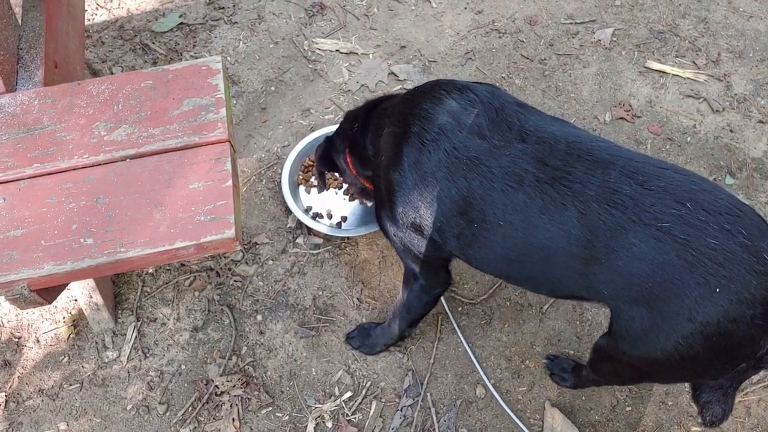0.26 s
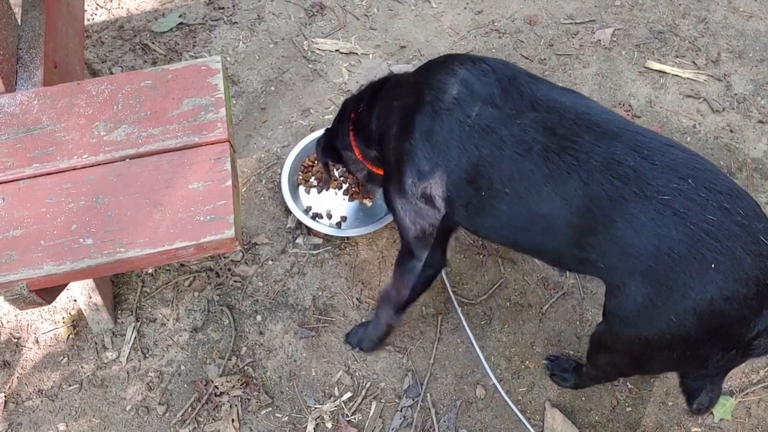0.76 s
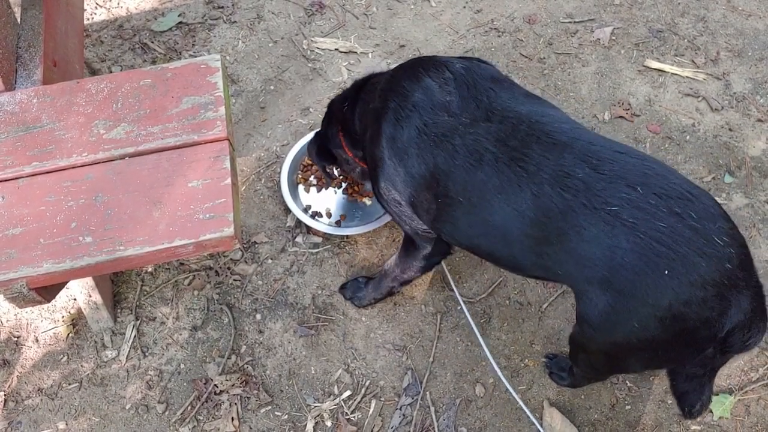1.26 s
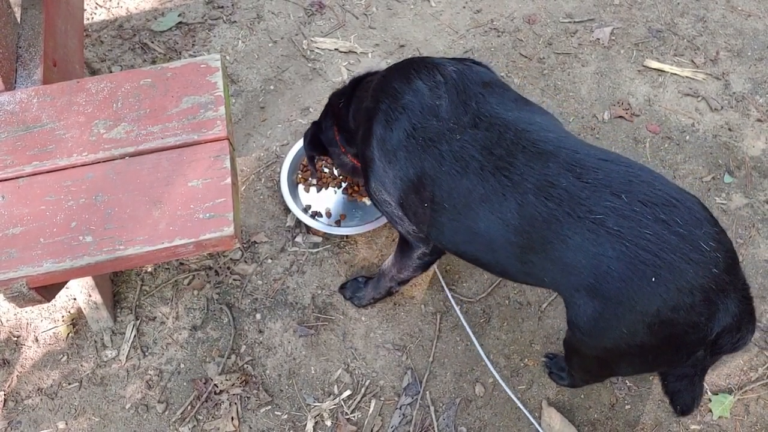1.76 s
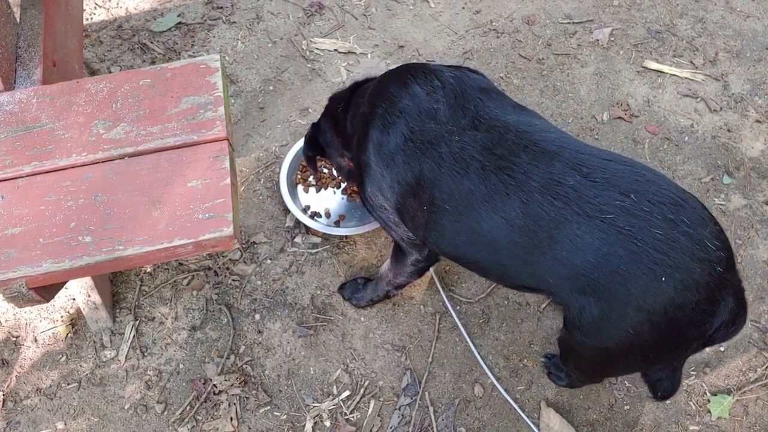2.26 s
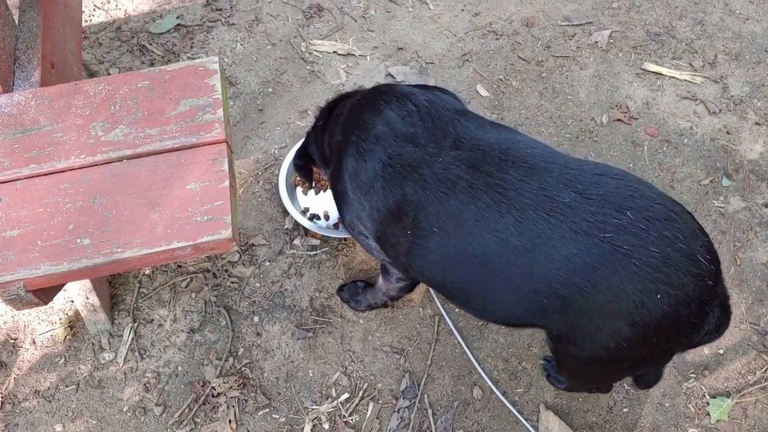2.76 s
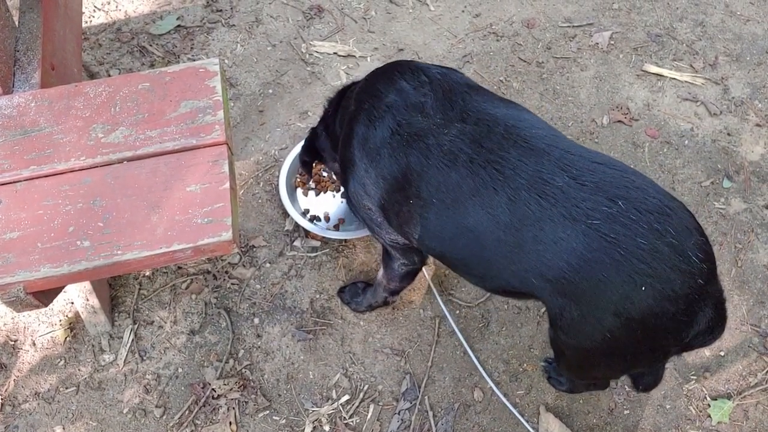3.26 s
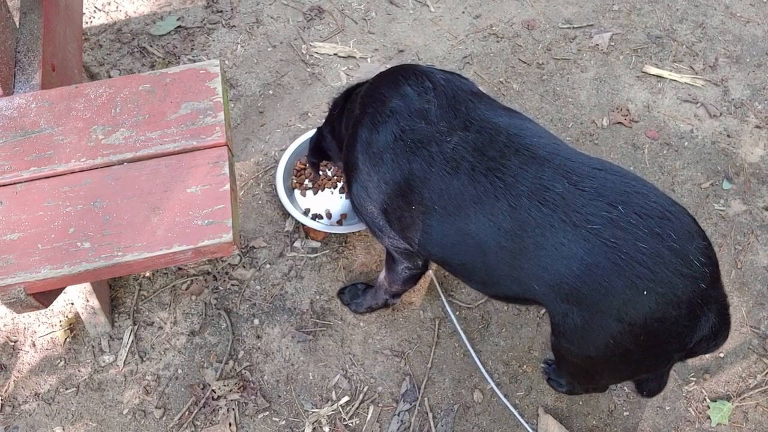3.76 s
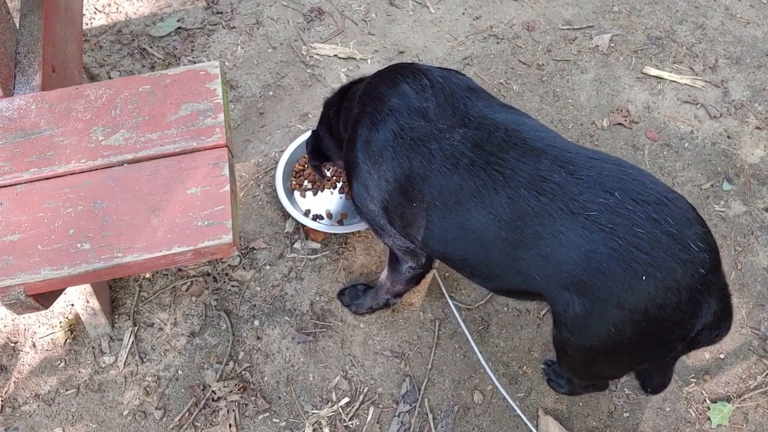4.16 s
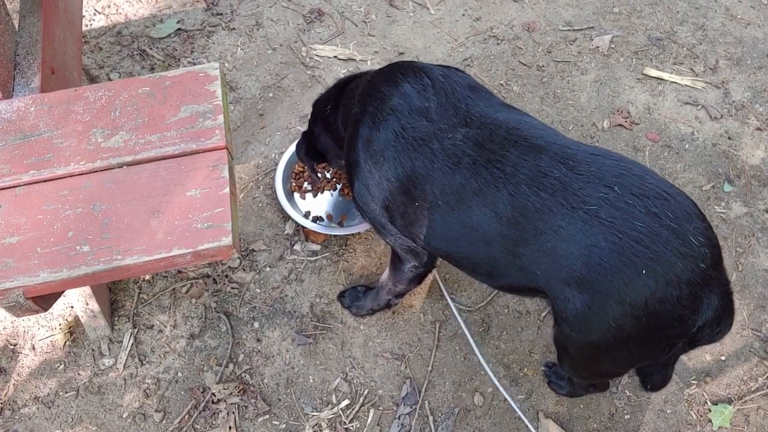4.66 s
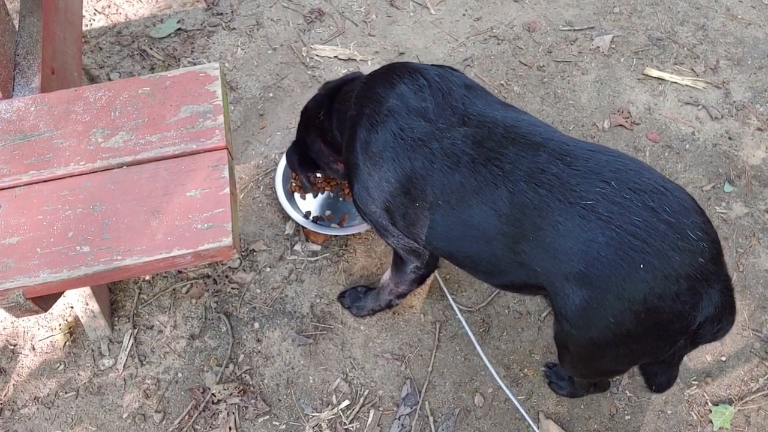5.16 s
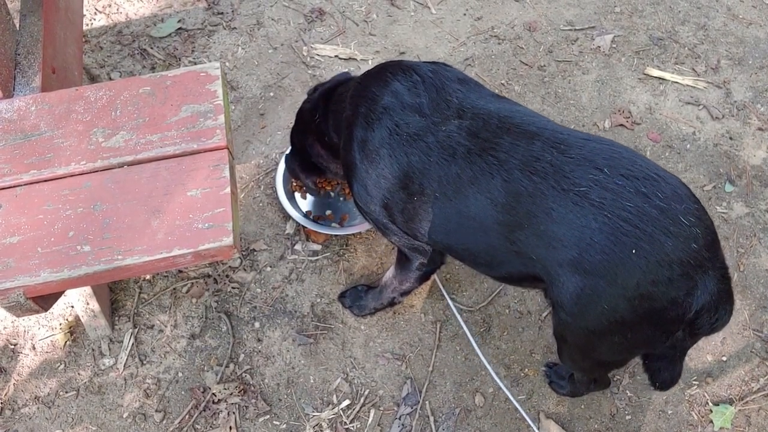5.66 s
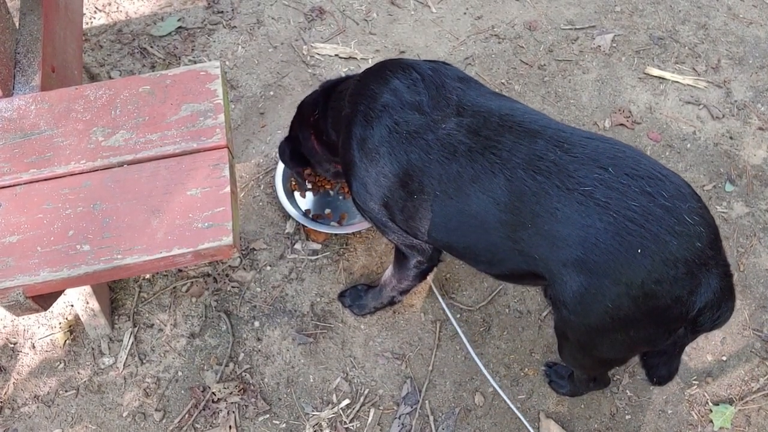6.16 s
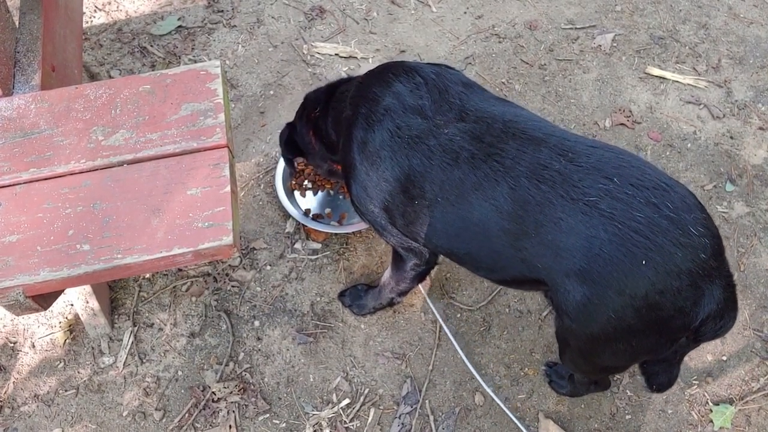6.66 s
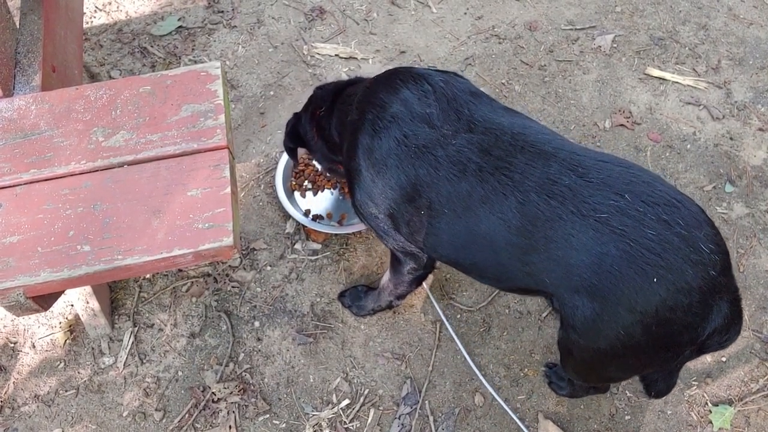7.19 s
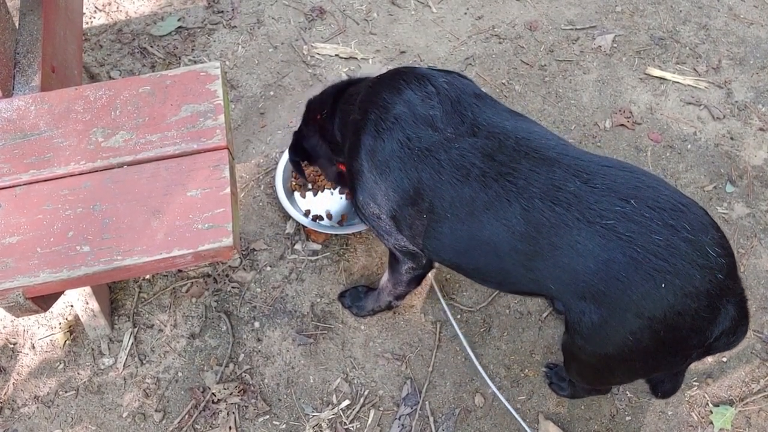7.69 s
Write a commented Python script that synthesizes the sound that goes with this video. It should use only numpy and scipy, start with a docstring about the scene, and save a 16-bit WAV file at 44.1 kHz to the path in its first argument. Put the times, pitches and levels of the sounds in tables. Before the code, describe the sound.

A dog eats dry kibble from a steel bowl on the ground, heard close from above in stereo. Sharp, hollow cracks and gritty grinding come in irregular clusters, with faint nose puffs and one small steel ring near the middle. A hollow knock sounds to the right late on, then another with a brief scrape. Insects hiss evenly over a faint distant rumble; outdoors, almost no echo.

```python
"""A dog eats dry kibble from a steel bowl outdoors, heard from above by a small stereo microphone.
Insects hiss in the trees over a far low rumble throughout: both are shaped noise.
From the start, pieces crack and crumble: decaying tones and dense clicks sound through the muzzle.
Throat hums and noisy nose puffs come in between; near 3 s a tooth rings the steel.
Late on, something hollow off to the right is knocked, knocked again and scraped."""
import sys
import numpy as np
from scipy import signal
from scipy.fft import rfft, irfft, next_fast_len
from scipy.io import wavfile
from scipy.ndimage import uniform_filter1d, map_coordinates

SR = 44100
rng = np.random.default_rng(int(sys.argv[2]) if len(sys.argv) > 2 else 0)


def unload_wav(signal):
    """Save mono or channel-first audio to the path in sys.argv[1] as 16-bit WAV at rate SR, clipped to [-1, 1]."""
    wavfile.write(
        sys.argv[1],
        SR,
        np.round(np.clip(np.atleast_2d(signal).T, -1, 1) * 32767).astype(np.int16),
    )


def gain_from_decibels(decibels):
    """Convert decibel values to linear amplitude factors."""
    exponent = np.asarray(decibels, float) / 20
    return 10 ** exponent


N = 349713  # length in samples

# Resonances of the bowl's hollow and the mouth.
# Each row: frequency in Hz, relative level in dB, ring length as a factor.
MOUTH_RESONANCES = [(1050, 3.5, 1.26), (1500, 0, 0.81), (1900, 2.5, 0.57), (2390, -0.5, 0.51),
                    (3080, -8, 0.68), (3650, -15, 1.1)]


def unit(x):
    """Scale a sound to rms 1."""
    return x / np.sqrt(np.mean(x ** 2) + 1e-20)


def along(points, hz):
    """Read a table of (Hz, value) points at any frequency, on a log axis."""
    f, value = np.transpose(points)
    return np.interp(np.log(hz + 1), np.log(f + 1), value)


def curve(rows, column):
    """Read a table of levels in dB at every sample; -120 dB outside the table."""
    rows = np.array(rows)
    return np.interp(np.arange(N) / SR, rows[:, 0], rows[:, column], -120, -120)


def wobble(rate):
    """A smooth random curve through so many random points a second."""
    knots = rng.standard_normal(int(N * rate / SR) + 4)
    return map_coordinates(knots, [np.arange(N) * rate / SR])


def fade(t, t60_s):
    """Exponential decay that falls by 60 dB in t60_s seconds."""
    return gain_from_decibels(-60 * t / t60_s)


def filtered(x, response):
    """Filter x by a complex function of frequency."""
    m = next_fast_len(N + 8192)
    return irfft(rfft(x, m) * response(np.fft.rfftfreq(m, 1 / SR)), m)[..., :N]


def resonance(f, hz, width_hz):
    """A resonator lets through a band around hz, with peak gain 1."""
    return 1j * f * width_hz / (hz * hz - f * f + 1j * f * width_hz)


def rings(t, hz, db, t60, chance, detune, attack, spread_db):
    """A struck body sums decaying tones, here slightly random in pitch and level; peak 1."""
    hz = hz * (1 + detune * chance[0])
    gain = gain_from_decibels(db + spread_db * chance[1])
    phase = 0.1 * chance[2][:, None]
    tones = fade(t, t60[:, None]) * np.sin(2 * np.pi * (hz[:, None] * t + phase))
    wave = (gain @ tones) * (1 - np.exp(-t / attack))
    return wave / np.abs(wave).max()


def add(track, s, wave):
    """Mix a short sound into a track at s seconds."""
    track[round(s * SR):][:len(wave)] += wave


def scatter(x):
    """Each port gets its own short, dull echo off bench and ground, as decaying noise."""
    t = np.arange(SR // 10) / SR
    tail = rng.standard_normal((2, len(t))) * fade(t, 0.039) * (t > .0008)
    dull = filtered(x, lambda f: 1 / (1 + 1j * f / 4000))
    return gain_from_decibels(-4.5) * signal.fftconvolve(dull[None], tail / np.linalg.norm(tail[0]), axes=1)[:, :N]


def kibble_cracks():
    """Each break rings the hollow near its own colour and splinters after it."""
    # Kibble breaking. Each row: time in seconds, peak of the ring in dB before filtering,
    # mouth colour in Hz.
    breaks = [(0.069, -40, 1900), (0.08, -31, 1420), (.0958, -28, 1210), (0.1422, -25.5, 1240),
              (0.39, -38, 2200), (0.4041, -29.5, 2250), (0.414, -32, 2100), (0.4315, -27.5, 1130),
              (.556, -44, 2100), (.582, -17, 1760), (0.6023, -32, 1740), (0.6495, -34, 1450),
              (0.685, -42, 2280), (0.736, -36, 1960), (.756, -41, 2000), (.799, -43, 1500),
              (0.8211, -29.5, 1430), (.889, -19, 1960), (.931, -36, 1170), (0.976, -43, 1020),
              (1.0637, -32.5, 1050), (1.0885, -38, 1180), (1.1567, -28, 1300), (1.208, -37, 1400),
              (1.2388, -30.5, 1360), (1.2533, -32.5, 1600), (1.285, -29, 1500), (1.312, -33, 1350),
              (1.3378, -39, 1580), (1.418, -41.5, 2160), (1.4554, -31.5, 1250), (1.485, -42, 1550),
              (1.5025, -33, 1250), (1.5869, -19, 1600), (1.5928, -34, 1640), (1.7177, -39, 2050),
              (1.789, -40, 1300), (1.8333, -46, 1880), (1.8567, -37, 1560), (1.886, -34, 1690),
              (1.9122, -38, 1610), (2.0281, -16.5, 1510), (2.0644, -34.5, 1240), (2.11, -43, 1050),
              (2.157, -28, 1630), (2.2083, -25, 1120), (2.221, -29.5, 2400), (2.266, -37.5, 1300),
              (2.343, -38, 2320), (2.3684, -40.5, 2400), (2.4344, -44, 1980), (2.562, -41, 1580),
              (2.5815, -33, 1980), (2.588, -37, 1940), (2.8858, -35.5, 1900), (3.133, -51, 1900),
              (3.3853, -37, 1450), (3.397, -40, 1530), (3.4087, -40, 1850), (3.4721, -36, 1580),
              (3.567, -25, 1770), (3.579, -31, 1580), (3.59, -28.5, 1400), (3.6169, -24, 1380),
              (3.6361, -31, 1470), (3.6761, -36.5, 1690), (3.707, -39, 1600), (3.738, -35.5, 1840),
              (3.9884, -36, 1540), (4.0127, -33, 1950), (4.117, -23.5, 2040), (4.132, -24.5, 1990),
              (4.1489, -31, 1790), (4.1965, -18.5, 1760), (4.411, -41, 1980), (4.445, -36.5, 1910),
              (4.4937, -41, 1910), (4.5365, -34.5, 2030), (4.5706, -31.5, 1600), (4.5836, -31.5, 1390),
              (4.6124, -22, 1340), (4.754, -31, 1900), (4.8271, -28.5, 1160), (4.8367, -23.5, 1250),
              (4.854, -27, 1500), (4.9625, -30, 1110), (4.9825, -32, 1780), (4.993, -20.5, 1320),
              (5.002, -13.5, 1410), (5.01, -31, 1740), (5.0215, -13.5, 1560), (5.0473, -25, 1470),
              (5.0726, -18.5, 1640), (5.104, -27.5, 1380), (5.2713, -35.5, 1540), (5.42, -37.5, 2400),
              (5.5056, -30, 1260), (5.5192, -21.5, 1810), (5.641, -35, 1800), (5.696, -28, 2070),
              (5.7181, -19, 1870), (5.742, -21.5, 1670), (5.7601, -21, 1830), (5.7739, -26.5, 1810),
              (5.83, -36, 1700), (5.889, -30.5, 1870), (5.916, -30, 2080), (5.948, -33.5, 1750),
              (6.0011, -32.5, 1210), (6.0194, -35, 1630), (6.0415, -40, 1250), (6.0612, -20, 1430),
              (6.0673, -17, 1770), (6.0796, -35, 1810), (6.142, -41, 1900), (6.192, -26, 1740),
              (6.1982, -19.5, 2000), (6.2064, -23.5, 1570), (6.3127, -27, 1640), (6.327, -30, 1620),
              (6.3367, -18.5, 1530), (6.3489, -28, 1680), (6.367, -33, 1710), (6.509, -31.5, 1900),
              (6.6101, -30.5, 1300), (6.6166, -35, 1670), (6.744, -35, 1450), (6.799, -44, 2020),
              (6.8056, -37.5, 1860), (7.198, -28, 1950), (7.211, -30.5, 1550), (7.2674, -31.5, 1590),
              (7.309, -38.5, 1720), (7.792, -43.5, 1900), (7.8845, -50, 1980)]
    body, t = np.zeros(N + SR), np.arange(SR // 10) / SR
    hz, level_db, length_factor = np.transpose(MOUTH_RESONANCES)
    luck = rng.standard_normal((len(breaks), 3, len(hz)))
    grit = rng.standard_normal((len(breaks), len(t)))
    for (s, db, colour_hz), chance, noise in zip(breaks, luck, grit):
        softer_db = -21 - db
        t60 = 0.015 * gain_from_decibels(0.27 * softer_db)  # harder cracks die sooner
        steepness = 12.5 + 0.33 * softer_db  # and ring a wider range around their colour
        near_db = level_db - steepness * np.log2(hz / colour_hz) ** 2
        ring = rings(t, hz, near_db, t60 * length_factor, chance,
                     detune=0.067, attack=0.00084, spread_db=1.5)
        spikes = noise ** 3 / 3 * fade(t, 0.059)  # cubing leaves a few strong spikes
        splinters = np.convolve(ring[:200], spikes)[:len(t)]
        add(body, s - .0006, gain_from_decibels(db) * (ring + gain_from_decibels(-32.5) * splinters))
    # a small piece radiates little bass
    return 1.202 * filtered(body[:N], lambda f: (1j * f / (1j * f + 600)) ** 6)


def tooth_knocks():
    """A tooth knocks the bowl's side, which answers with short damped tones."""
    # Knocks. Each row: time in seconds, peak in dB.
    bumps = [(.0958, -49), (2.0286, -43.5), (2.157, -26.5), (2.2083, -23.5), (2.2202, -29.5),
             (3.9894, -43.5), (4.446, -42.5), (5.5052, -41), (5.83, -44), (5.845, -51), (6.744, -27),
             (6.799, -50), (6.8066, -32.5), (7.1968, -27.5), (7.2106, -37), (7.2487, -38.5), (7.2674, -43),
             (7.31, -49.5)]
    # Tones of a knock. Each row: frequency in Hz, relative level in dB, time to fade 60 dB in seconds.
    knock_tones = [(287, -7, 0.014), (515, -6, 0.024), (704, 0, 0.055), (850, -5, 0.035), (2350, -5, 0.017),
                   (2950, -5, .015)]
    out, t = np.zeros(N + SR), np.arange(SR // 10) / SR
    hz, level_db, t60 = np.transpose(knock_tones)
    for s, db in bumps:
        chance = rng.standard_normal((3, len(hz)))
        knock = rings(t, hz, level_db, t60, chance, detune=.02, attack=.0006, spread_db=1.5)
        add(out, s - .0006, gain_from_decibels(db) * knock)
    return out[:N]


def brittle_snaps():
    """Brittle pieces snap in the open between the front teeth: bright bursts of noise."""
    # Snaps. Each row: time in seconds, starting noise level in dB before filtering.
    breaks = [(.582, -37.5), (0.891, -29.5), (1.5869, -27), (1.5932, -37), (2.0281, -40), (4.116, -30.5),
              (5.0223, -38.5), (6.0675, -39), (6.7437, -39.5)]
    bursts, t = np.zeros(N + SR), np.arange(SR // 10) / SR
    for s, db in breaks:
        add(bursts, s, gain_from_decibels(db) * fade(t, 0.013) * rng.standard_normal(len(t)))
    return filtered(bursts[:N], lambda f: 2.43 * resonance(f, 6550, 3200) ** 3)


def crumble():
    """Dense tiny breaks excite the hollow; each grind swells and fades, brighter with an open mouth."""
    # Jaws grinding a mouthful. Each row: middle in seconds, length in seconds, level in dB before
    # the mouth opening, opening in dB by which the upper resonances gain on the lower.
    grinds = [(0.066, 0.087, -48.5, 5), (0.18, 0.039, -59, -6), (0.356, 0.069, -50, 0),
              (0.404, 0.071, -40.5, 2), (0.602, 0.065, -56, -8), (0.767, 0.17, -56, -3),
              (0.913, 0.083, -59, -1), (1.082, 0.089, -50, -5), (1.245, 0.086, -52, -7),
              (1.472, 0.11, -57, -9), (1.854, .12, -60, 4), (1.964, 0.066, -56, -1), (2.25, .08, -64, 1),
              (2.436, 0.14, -59.5, 1), (2.576, 0.061, -52, 4), (2.994, 0.2, -59, 5),
              (3.298, 0.12, -56.5, -5), (3.44, 0.19, -48.5, -3), (3.576, .12, -44.5, -1),
              (3.68, 0.16, -50.5, -1), (3.993, .14, -60, 7), (4.137, 0.066, -53, 7), (4.274, 0.072, -71, 6),
              (4.434, 0.12, -63, 5), (4.554, 0.26, -53, 1), (4.866, 0.3, -55.5, -5),
              (5.055, 0.18, -49.5, -1), (5.594, 0.19, -52.5, 1), (5.725, 0.13, -47, -2),
              (5.905, 0.27, -47.5, 2.5), (6.037, 0.16, -51.5, -7), (6.22, .14, -56, -3),
              (6.403, 0.11, -56, 8), (7.087, 0.23, -53, 9), (7.24, 0.15, -50.5, 2.5),
              (7.303, 0.034, -54, 5), (7.4, 0.034, -60.5, 4), (7.464, 0.051, -61.5, -5),
              (7.9, 0.11, -58, 7.5)]
    # Crumbs shifting in the mouth. Each row: time in seconds, level in dB before its random wobble.
    crumbs = [(0, -58.5), (.5, -66), (1.7, -59), (2.8, -67), (4.3, -57), (5.3, -68), (6.2, -62),
              (6.8, -70.5), (7.93, -67)]
    chance_per_sample = 1600 * gain_from_decibels(5.5 * wobble(80)) / SR  # the breaks come in clumps
    size_db = np.minimum(3.3 * rng.exponential(size=N), 13)
    bits = (rng.random(N) < chance_per_sample) * rng.standard_normal(N) * gain_from_decibels(size_db)

    def hollow(part):
        def response(f):
            total = 0
            for k, (hz, db, length_factor) in enumerate(part):
                # neighbours alternate in sign
                total = total + (-1) ** k * gain_from_decibels(db) * resonance(f, hz, 260 / length_factor ** 2)
            return resonance(f, 1710, 3200) ** 2 * total
        return unit(filtered(bits, response))

    t = np.arange(N) / SR
    lower = upper = gain_from_decibels(curve(crumbs, column=1) + 1.15 * wobble(11))
    for s, long, db, open_db in grinds:
        swell = gain_from_decibels(db) * np.cos(np.pi * np.clip((t - s) / long, -.5, .5)) ** 2
        lower = lower + swell * gain_from_decibels(-open_db / 2)
        upper = upper + swell * gain_from_decibels(open_db / 2)
    both = lower * hollow(MOUTH_RESONANCES[:2]) + upper * hollow(MOUTH_RESONANCES[2:])
    return both / np.sqrt(2)


def steel_bowl():
    """A tooth strikes the steel, which rings briefly in its own tones."""
    # Strikes. Each row: time in seconds, peak in dB.
    strikes = [(2.996, -36.5)]
    # Tones of the steel. Each row: frequency in Hz, relative level in dB, time to fade 60 dB in seconds.
    steel = [(800, -12, 0.083), (919, -4.5, .12), (1010, -9.5, 0.22), (1510, -12, 0.16), (1870, -2, 0.091),
             (2630, -4, 0.049)]
    out, t = np.zeros(N + SR), np.arange(SR // 4) / SR
    hz, level_db, t60 = np.transpose(steel)
    for s, db in strikes:
        chance = rng.standard_normal((3, len(hz)))
        ring = rings(t, hz, level_db, t60, chance, detune=.002, attack=.002, spread_db=1)
        add(out, s, gain_from_decibels(db) * ring)
    return out[:N]


def sniffs():
    """Air rushes through the nose in short soft puffs of band-passed noise."""
    # Nose puffs. Each row: start in seconds, length in seconds, level at the middle in dB.
    puffs = [(2.33, 0.078, -59), (2.98, 0.041, -52.5), (3.542, 0.073, -52)]
    t, swell = np.arange(N) / SR, np.zeros(N)
    for s, long, db in puffs:
        swell += gain_from_decibels(db) * np.sin(np.pi * np.clip((t - s) / long, 0, 1))
    return swell * unit(filtered(rng.standard_normal(N), lambda f: resonance(f, 6400, 3400) ** 2))


def gulps():
    """The throat hums low and briefly, with a gliding pitch."""
    # Gulps. Each row: start in seconds, length in seconds, first pitch in Hz, last pitch in Hz,
    # peak in dB.
    hums = [(0.745, 0.055, 273, 166, -55), (5.607, 0.034, 194, 287, -48.5)]
    t, out = np.arange(N) / SR, np.zeros(N)
    for s, long, from_hz, to_hz, db in hums:
        u = np.clip((t - s) / long, 0, 1)
        cycles = long * (from_hz * u + (to_hz - from_hz) * u * u / 2)
        out += gain_from_decibels(db) * np.sin(np.pi * u) * np.sin(2 * np.pi * cycles)
    return out


def ports(x):
    """The microphone's two ports hear the dog with a different tilt and phase, plus echoes."""
    # Level balance of the ports. Each row: frequency in Hz, left over right in dB.
    tilt = [(300, -3), (650, -10.5), (1200, -3), (2100, 9.5), (3500, 1), (8000, -0.5)]
    # Phase between the ports. Each row: frequency in Hz, radians by which left leads.
    lead = [(500, 0.056), (1400, 0.015), (3000, 0.84), (5000, 0.99)]
    side = np.array([[.5], [-.5]])
    direct = filtered(x, lambda f: gain_from_decibels(side * along(tilt, f)) * np.exp(1j * side * along(lead, f)))
    return direct + scatter(x)


def hollow_knocks():
    """A hollow thing is knocked: a thud and a buzzing ring; returned with its raw sharp snaps."""
    # Knocks. Each row: time in seconds, thud peak in dB, thud's time to fade 60 dB in seconds,
    # ring level in dB before it buzzes, ring length as a factor, snap level in dB before filtering.
    blows = [(5.652, -12.5, 0.018, -26, 0.93, -28), (7.009, -15.5, 0.0065, -15, 0.061, -15.5)]
    # Tones of the thud, shared by both knocks. Each row: frequency in Hz, relative level in dB.
    thud_tones = [(520, -11.5), (1050, -4), (1350, 1), (1650, -2), (2400, -10), (3100, -29)]
    # Tones of the ring. Each row: frequency in Hz, relative level in dB,
    # time to fade 60 dB in seconds before the length factor.
    ring_tones = [(643, -12, .07), (1126, 0, .17), (1910, -2, 0.2), (2560, -25, 0.068), (3018, -11, 0.17)]
    (out, snaps), t = np.zeros((2, N + SR)), np.arange(SR // 4) / SR
    hz, level_db, t60 = np.transpose(ring_tones)
    thud_hz, thud_db = np.transpose(thud_tones)
    for s, db, thud_t60, ring_db, length_factor, snap_db in blows:
        chance = rng.standard_normal((3, len(thud_hz)))
        thud = rings(t, thud_hz, thud_db, np.full(len(thud_hz), thud_t60), chance,
                     detune=0.025, attack=0.00095, spread_db=8.0)
        chance = rng.standard_normal((3, len(hz)))
        ring = rings(t, hz, level_db, t60 * length_factor, chance,
                     detune=.002, attack=.002, spread_db=1)
        buzz = gain_from_decibels(ring_db + 3.6 * wobble(250)[:len(t)])
        add(out, s, gain_from_decibels(db) * thud + buzz * ring)
        spike = fade(t, 0.0042) * (1 + 0.5 * rng.standard_normal(len(t)))
        add(snaps, s + 0.00152, gain_from_decibels(snap_db) * spike)
    return out[:N], snaps[:N]


def scrape():
    """Stick and slip of the dragged thing drives its resonances with rough noise."""
    # Its resonances. Each row: frequency in Hz, width in Hz, relative level in dB.
    modes = [(240, 103, -1), (750, 104, 3.5), (1450, 270, -4.5), (1840, 190, -5), (2530, 170, -6.5),
             (3280, 260, -10.5)]
    # The drag: start in seconds, length in seconds, rasp level in dB.
    drag = (7.02, 0.14, -43)
    # Catching on the ground. Each row: time in seconds, starting level in dB.
    catches = [(7.019, -41.5), (7.096, -38.5), (7.125, -46), (7.155, -44)]
    grit = rng.standard_normal(N) * gain_from_decibels(4 * wobble(160))

    def voiced(part):
        def response(f):
            total = 0
            for k, (hz, width_hz, db) in enumerate(part):
                total = total + (-1) ** k * gain_from_decibels(db) * resonance(f, hz, width_hz)
            return total
        return unit(filtered(grit, response))

    t = np.arange(N) / SR
    start, long, rasp_db = drag
    # stays at half strength, grows to full over the second half, then dies away
    growth = np.clip((t - start) / long, .5, 1) * (t > start)
    moving = growth * fade((t - start - long).clip(0), 0.052)
    jolts = np.zeros(N)
    for s, db in catches:
        jolts += gain_from_decibels(db) * fade(np.abs(t - s), 0.11) * (t > s)
    dull = gain_from_decibels(-49.5) * moving + jolts
    rasp = gain_from_decibels(rasp_db) * moving + gain_from_decibels(-12) * jolts
    return dull * voiced(modes[:2]) + rasp * voiced(modes[2:])


def aside():
    """Knocks and scrape come from the right: the left port hears thud, ring and scrape later."""
    knocks, snaps = hollow_knocks()
    right = knocks + scrape()
    lag_s = 0.000518
    left = filtered(right, lambda f: gain_from_decibels(3.0) * np.exp(-2j * np.pi * f * lag_s))
    snap = filtered(snaps, lambda f: 3.54 * resonance(f, 3940, 5400) ** 2 / (1 + 1j * f / 7000))
    return np.array([left, right]) + scatter(right) + snap * gain_from_decibels([[2.5], [-4]])


def rush(spectrum, patchy_db):
    """Many far sources blur into stereo noise of rms 1, with random gain in patches."""
    # Left-right correlation of the background as stored; nearly mono above 7 kHz.
    # Each row: frequency in Hz, correlation from 0 to 1.
    alike = [(30, 0.89), (100, 0.92), (150, 0.61), (360, 0.5), (870, 0.1), (2130, 0.013), (6500, 0.1),
             (7200, 1), (12000, 0.78)]
    z = signal.stft(rng.standard_normal((2, N)), nperseg=512)[2]
    patches = uniform_filter1d(rng.standard_normal(z.shape[1:]), 6, 0)  # smooth over frequency
    patches = unit(uniform_filter1d(patches, 10, 1))  # and over time
    pair = signal.istft(z * gain_from_decibels(patchy_db * patches), nperseg=512)[1][:, :N]

    def mid_and_side(f):
        angle = np.arccos(np.clip(along(alike, f), -1, 1)) / 2
        return gain_from_decibels(along(spectrum, f)) * [np.cos(angle), np.sin(angle)]

    mid, side = filtered(pair, mid_and_side)
    return unit(np.array([mid + side, mid - side]))


def background():
    """A lumpy low rumble and a smooth, slightly shimmering insect chorus, both of shaped noise."""
    # Colour of the far rumble. Each row: frequency in Hz, relative level in dB.
    rumble_colour = [(18, -26), (28, -7), (42, -2), (81, 0.5), (102, -10), (120, -3.5), (140, -15),
                     (190, -19.5), (420, -20.5), (850, -19), (1400, -36), (1820, -70), (3000, -120)]
    # Colour of the insects. Each row: frequency in Hz, relative level in dB.
    insect_colour = [(760, -69), (1300, -19), (1650, -7.5), (1870, -25), (2020, -17), (2550, -8), (3280, 1),
                     (6130, -4), (6690, 2), (7580, -10.5), (11700, -29.5), (12500, -31), (13000, -61)]
    # Slow changes. Each row: time in seconds, rumble level in dB, insect level in dB;
    # both before the offsets and wobbles added below.
    air = [(0.0, -55, -50.5), (1.87, -55, -51.5), (3.36, -56, -51), (3.84, -53.5, -51), (4.22, -56.5, -50),
           (4.82, -54, -51.5), (5.34, -55, -50.5), (6.29, -56, -51.5), (6.67, -54.5, -50),
           (7.42, -56.5, -52.5), (7.93, -54.5, -51.5)]
    rumble_db = curve(air, column=1) + 2.8 + 1.1 * wobble(2.6)
    insects_db = curve(air, column=2) + 1.5 + 0.6 * wobble(2.1)
    rumble = gain_from_decibels(rumble_db) * rush(rumble_colour, patchy_db=0.5)
    insects = gain_from_decibels(insects_db) * rush(insect_colour, patchy_db=1.07)
    return rumble * gain_from_decibels([[.7], [-.7]]) + insects * gain_from_decibels([[.6], [-.6]])  # left slightly louder


def scene():
    """The dog close below, knocks to the right, the background all round."""
    bites = kibble_cracks() + tooth_knocks() + brittle_snaps()
    dog = bites + crumble() + steel_bowl() + sniffs() + gulps()
    return ports(dog) + aside() + background()


def low_pass(x):
    """Removes everything above the highest recorded frequency."""
    return signal.sosfilt(signal.butter(12, 12400, fs=SR, output="sos"), x)


def record(dry):
    """The microphone rolls off in the top treble."""
    heard = filtered(dry, lambda f: 1 / (1 + (f / 12800) ** 16))
    return low_pass(heard)


dry = scene()
out = record(dry)
unload_wav(out)
```